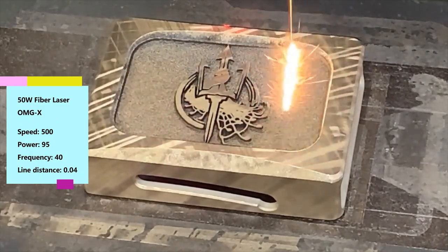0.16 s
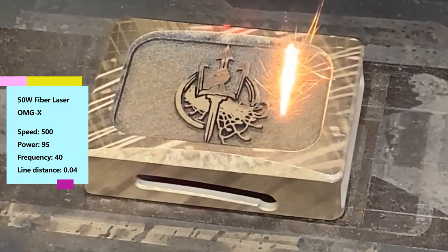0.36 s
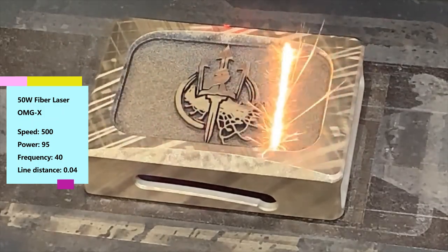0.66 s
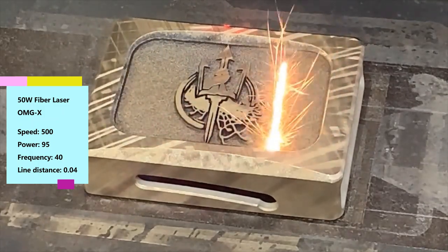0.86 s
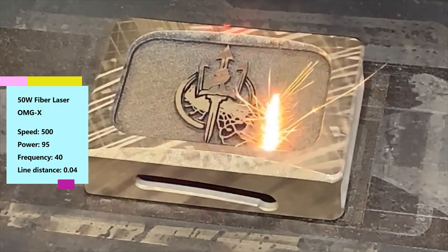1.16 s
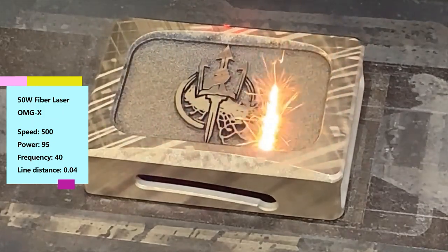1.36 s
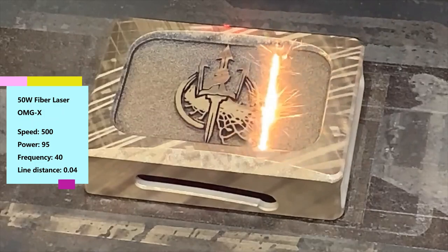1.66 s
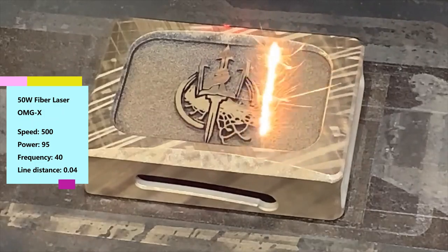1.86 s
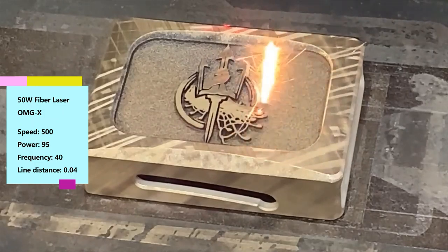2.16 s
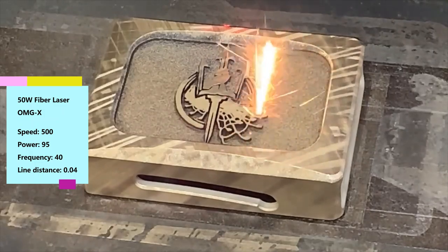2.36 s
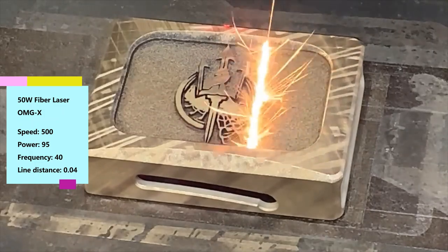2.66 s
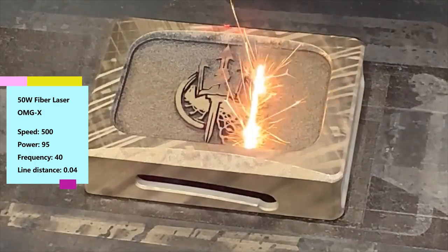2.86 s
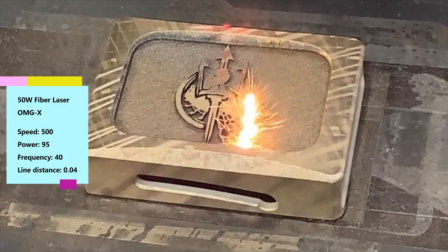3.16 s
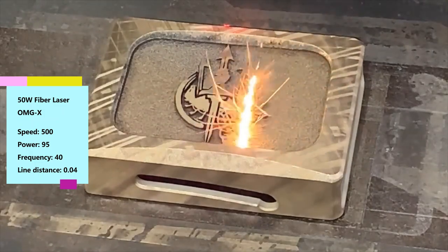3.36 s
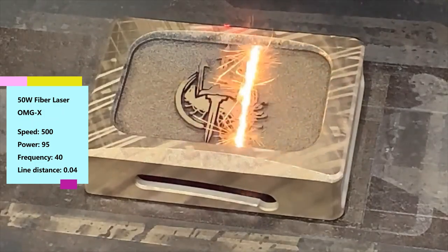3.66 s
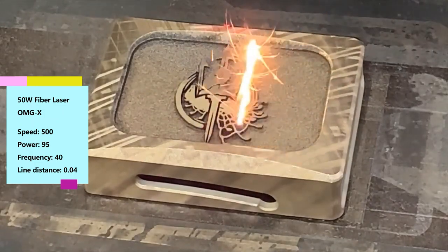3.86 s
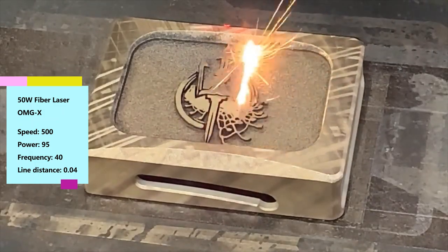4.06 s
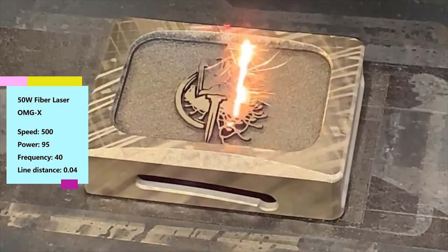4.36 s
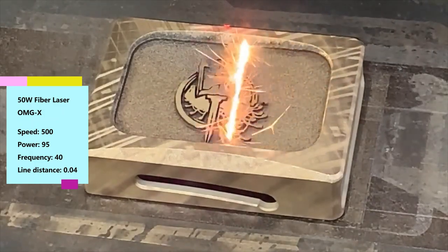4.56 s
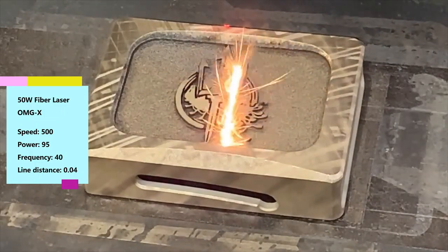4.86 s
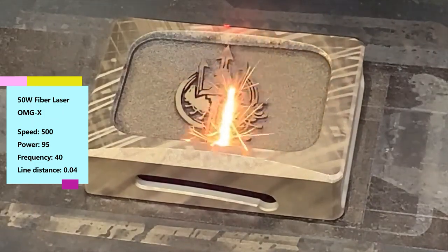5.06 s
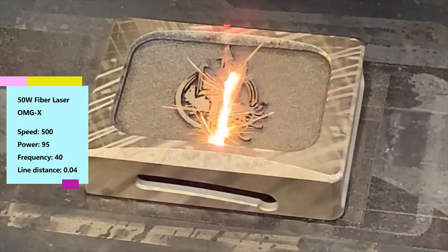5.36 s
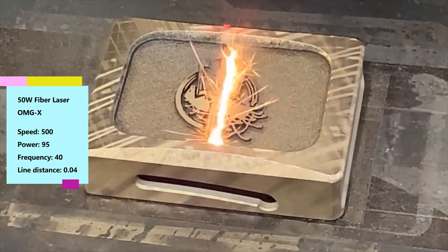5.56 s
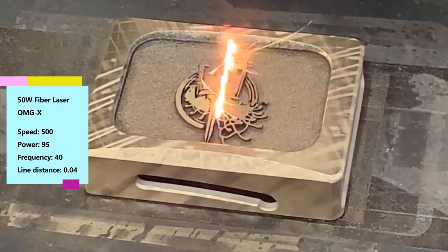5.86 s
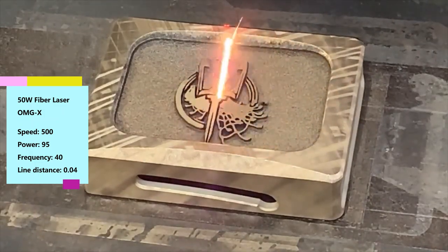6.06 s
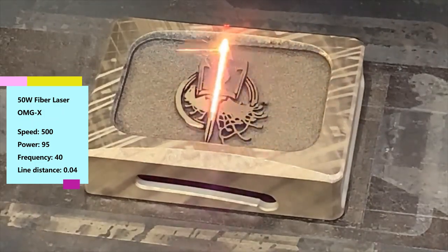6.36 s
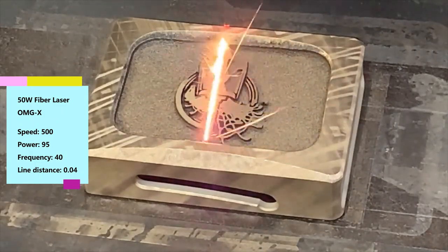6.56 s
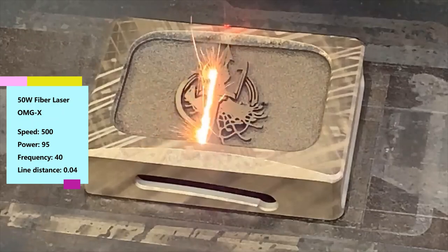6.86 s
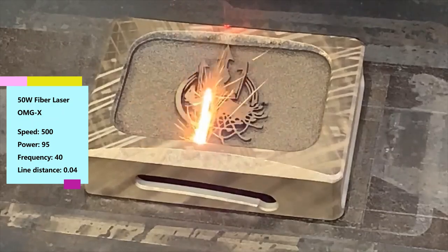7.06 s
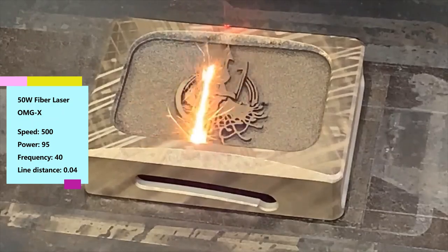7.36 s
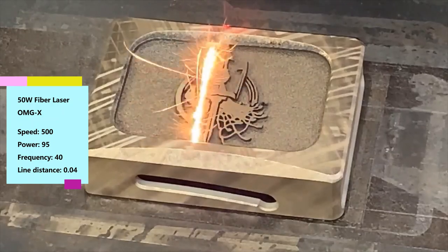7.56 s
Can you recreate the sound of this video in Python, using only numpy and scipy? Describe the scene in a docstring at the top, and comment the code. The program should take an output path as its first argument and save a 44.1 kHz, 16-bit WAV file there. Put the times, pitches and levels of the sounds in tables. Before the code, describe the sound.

A laser engraves a metal plate in a workshop. A bright, harsh hiss flutters very fast, with a raspy buzz underneath and quick spark flares throughout. Around six seconds it turns patchy and crackly with dry ticks, then returns to a steady sizzle. An extractor rumbles low behind it with faint fan hum. Close microphone, slightly stereo, dry sound.

```python
"""A fiber laser deep-engraves an emblem into a metal plate, running up and down one line about 29 times a second.
Boiling metal hisses and flutters as shaped noise, loudest near the turns at the start of the line; shapes
switch its level, and each spark is a quick flare. Raspy overtones, fuzzy whistles and dry ticks join it.
Behind it an extractor rumbles as filtered noise with an unsteady low drone, and fan tones hum."""
import sys
import numpy as np
from scipy import signal
from scipy.fft import rfft, irfft, next_fast_len
from scipy.io import wavfile
from scipy.ndimage import uniform_filter1d, map_coordinates

SR = 44100
rng = np.random.default_rng(int(sys.argv[2]) if len(sys.argv) > 2 else 0)


def bounce(signal):
    """Save signal as a 16-bit WAV file at the path given by the first command-line argument."""
    frames = np.transpose(np.atleast_2d(signal))
    limited = np.clip(frames, -1, 1)
    pcm = np.round(limited * 32767).astype(np.int16)
    wavfile.write(sys.argv[1], SR, pcm)


N = 340893
T = np.arange(N) / SR  # time, s
SIZE = next_fast_len(N, True)
HZ = np.fft.rfftfreq(SIZE, 1 / SR)

SWEEP_HZ = 29.465  # round trips of the beam each second


# Colour of the hiss in the middle and at the sides; only its shape counts: pitch_hz, density_db (per Hz)
HISS_COLOUR = [(350, -50), (600, -1), (708, -7), (774, -10), (856, -7.5), (1560, -16.5), (2050, -18),
               (2500, -17.5), (3800, -48), (4400, -33), (4900, -26.5), (5300, -4.5), (5610, -9),
               (8120, -1.5), (9330, -1), (11600, -5), (12500, -23), (16200, -57), (22000, -120)]
HISS_SIDE_COLOUR = [(530, -42), (900, -12), (1370, -19), (1560, -12), (2550, -14), (3560, -2), (4290, -4),
                    (4670, -2), (5680, -3), (6200, -12), (7290, 0), (8580, -3), (9250, -10), (9980, -6),
                    (12000, -29), (15600, -59), (22000, -120)]
# Resonances the hiss takes on in the middle and at the sides: pitch_hz, width_hz, boost_db
HISS_RESONANCES = [(827, 580, -22.5), (2386, 384, -12.5), (5840, 190, 5), (6310, 680, 4.5),
                   (9304, 1370, 5.5), (10260, 700, 0.5), (11140, 1420, 4.5)]
HISS_SIDE_RESONANCES = [(3500, 400, 2.5), (4250, 300, 0.5), (4630, 340, 3.5), (6200, 700, 2),
                        (7300, 800, 2.5), (8460, 600, 5), (8970, 600, -13), (10800, 440, -12)]


def laser(hiss_db=-27.5, side_db=-35):
    """The burning spot, a little off centre; a separate side hiss stands for reflections from the bed."""
    vapour = plume()
    jet = lingering(np.hypot(vapour, sparks(vapour)))
    middle_hiss = shifting(hiss(jet, colour(HISS_COLOUR, HISS_RESONANCES)))
    mid = gain_of(hiss_db) * middle_hiss + rings(jet) + buzz()
    side_hiss = hiss(jet, colour(HISS_SIDE_COLOUR, HISS_SIDE_RESONANCES))
    side = gain_of(side_db) * side_hiss + off_centre(mid)
    return np.array([reflected(mid + side), reflected(mid - side)])


def plume(relief_db=0.5, memory_s=0.45, boiling_db=0.5, boiling_hz=2700):
    """Moment-to-moment strength of the vapour jet: design, rough surface and boiling."""
    rough_db = relief_db * relief(memory_s, count=28)
    return gain_of(bite() + rough_db + boiling_db * drift(boiling_hz))


def beam_place(turn_s=0.0213):
    """Where the beam is on its line, 0 to 1 and back at a steady speed; it is at the start at turn_s."""
    return 2 * abs(((T - turn_s) * SWEEP_HZ + .5) % 1 - .5)


# Shapes of the emblem, crossed on the way out and back; skipped ones are negative, fresh metal is positive:
# start_s, end_s, near_place (0-1 along the line), far_place (0-1), change_db
EMBLEM_SHAPES = [(0.216, 1.44, 0.01, 0.26, 1), (3.895, 4.082, 0.06, 0.22, 3), (3.94, 4.477, 0.03, 1, -1.5),
                 (4.32, 4.656, 0, 0.8, -1), (4.37, 4.647, 0.38, 0.54, -9), (5.78, 6.413, 0.04, 0.84, -2.5),
                 (5.804, 5.93, 0.96, 1.1, -21), (5.869, 6.05, 0.04, 0.46, -10),
                 (6.104, 6.225, 0.63, 0.88, -9), (6.215, 6.627, 0.51, 1.1, -3),
                 (6.23, 6.39, 0.06, 0.34, -13), (6.41, 6.498, 0.11, 0.25, 9), (6.5, 6.6, 0.55, 1.1, -5),
                 (6.24, 6.42, 0.3, 0.95, -3.5), (6.51, 6.6, 0.42, 0.72, -4)]


def bite(tilt_db=1.9, dwell_db=2.5, dwell_share=0.75, outline_s=0.055, outline_share=0.017):
    """How strongly the beam burns where it is now, in dB: lean of the line, turning points and shapes."""
    place = beam_place()
    db = tilt_db * (.5 - place)  # bites harder at the start of the line
    to_turn = np.minimum(place, 1 - place)
    db += dwell_db * np.exp(-to_turn / dwell_share)
    for start_s, end_s, near, far, shape_db in EMBLEM_SHAPES:
        # outlines are met gradually, from sweep to sweep and along the line
        present = inside(T, start_s, end_s, outline_s)
        db += shape_db * present * inside(place, near, far, outline_share)
    return db


def relief(memory_s, count):
    """Roughness under the beam, count bumps a sweep; each sweep meets nearly the same bumps as the last."""
    bumps = rng.standard_normal((int(T[-1] * SWEEP_HZ) + 20, count))
    kept = np.exp(-1 / (memory_s * SWEEP_HZ))
    bumps = signal.lfilter([1], [1, -kept], bumps, axis=0)
    bumps = bumps[::-1].ravel()  # starts from the sweeps whose memory has settled
    return evened(np.interp(T * SWEEP_HZ * count, np.arange(len(bumps)), bumps))


# The largest sparks, which also snap if they fall in the crackle: start_s, peak_db, rise_s
LARGE_SPARKS = [(0.392, -13, 0.0032), (0.459, -10, 0.0016), (0.4923, -14, 0.0018), (0.766, -12.5, .0015),
                (0.8074, -16, .002), (0.8325, -15, 0.0018), (1.037, -14.5, 0.0019), (1.4108, -12, 0.0011),
                (1.684, -13, 0.0018), (2.363, -17, 0.00059), (3.8541, -13, 0.0012), (4.537, -22, 0.0018),
                (4.5465, -20, 0.0016), (5.1454, -10, 0.0016), (5.164, -10, 0.00082), (5.1814, -14, 0.00087),
                (5.1944, -13.5, .001), (5.228, -10, 0.0011), (5.247, -13, 0.0024), (5.316, -12, .001),
                (5.3844, -15, 0.0017), (5.9011, -24, 0.0012), (5.9696, -21, 0.0048), (5.993, -15, .001),
                (6.0274, -20, .0008), (6.041, -17, 0.0022), (6.0762, -22, .0012), (6.1446, -11.5, 0.001),
                (6.18, -16, .0007), (6.196, -19, 0.0011), (6.2647, -16, 0.00062), (6.2985, -15.5, 0.00091),
                (6.333, -13.5, 0.0008), (6.366, -18, 0.0013), (6.4, -13, 0.0016), (6.4384, -12.5, 0.0011),
                (6.4702, -9.5, 0.001), (6.4989, -24, .002), (6.5524, -27, .0007), (6.5676, -20, 0.002),
                (6.5995, -19, .003), (6.6334, -18, .003), (6.837, -14, 0.0018)]


def sparks(jet, per_s=12, spark_db=-8, spread_db=2, rise_s=0.0016, jet_peak_db=-19.5):
    """Small sparks flare at random with the jet; large ones are timed and set against jet_peak_db."""
    flying = rng.random(N) < per_s / SR
    kicks = flying * jet * gain_of(spark_db + spread_db * rng.uniform(-0.92, 1, N))
    out = signal.oaconvolve(kicks, flare(T[T < 10 * rise_s] / rise_s))[:N]
    for start_s, peak_db, large_rise_s in LARGE_SPARKS:
        lit = (T >= start_s) & (T < start_s + 10 * large_rise_s)
        out[lit] += gain_of(peak_db - jet_peak_db) * flare((T[lit] - start_s) / large_rise_s)
    return out


def flare(age):
    """A spark flares quickly and dies more slowly; its peak is at an age of one."""
    return age * np.exp(1 - age)


def lingering(jet, wet=0.13, ring_s=0.0026):
    """The machine's bed and frame hold a share of each flare's power for a few milliseconds."""
    kept = np.exp(-1 / (ring_s * SR))
    tail = signal.lfilter([1 - kept], [1, -kept], jet ** 2)
    return np.sqrt((1 - wet) * jet ** 2 + wet * tail)


# How hard the metal burns; the hiss follows only departures from each column's mean, the buzz the values:
# time_s, sizzle_db, lower_hiss_db (relative to the sizzle), hollow_body_db (relative to the sizzle)
BURN_CURVE = [(0.0, -29.5, -6, -24), (0.4, -30, -5.2, -25), (1.0, -30, -5.5, -25),
              (1.5, -30.5, -5.3, -25.5), (1.72, -29, -5, -24.5), (1.92, -30, -3.5, -22),
              (2.15, -29, -4, -22.5), (2.35, -30, -3.5, -23), (2.66, -28, -4, -24),
              (2.85, -30, -2.5, -23.5), (3.4, -30.5, -3.3, -21), (3.9, -29.5, -3, -23),
              (4.36, -29, -2.5, -22), (4.65, -28, -1, -22.5), (4.9, -30.5, -2.5, -21.5),
              (5.08, -31, -3, -21), (5.3, -31, -1.5, -20.5), (5.7, -30, -1.5, -20.5),
              (5.9, -29.5, -4, -24.5), (6.2, -32.5, 0, -21), (6.6, -30.5, -0.5, -22),
              (6.87, -29, -2.5, -24), (7.73, -30, -2.5, -22.5)]


def hiss(jet, gain, lower_depth=1.0, body_depth=0.15, own_db=0.1, own_hz=300):
    """Noise of the jet in three ranges; each follows the burn and has some flutter of its own."""
    burn, lower, body = (db - db.mean() for db in curves(BURN_CURVE))
    under_sizzle, under_lower = below(7960, order=16), below(3500, order=8)
    # range passed, its fullness in dB, how deeply the jet moves it
    ranges = [(np.sqrt(1 - under_sizzle ** 2), 0, 1),
              (under_sizzle * np.sqrt(1 - under_lower ** 2), lower, lower_depth),
              (under_lower, body, body_depth)]
    out = 0
    for passed, fullness_db, depth in ranges:
        strength = evened(jet ** depth * gain_of(burn + fullness_db + own_db * drift(own_hz)))
        out = out + filtered(strength * rng.standard_normal(N), passed * gain)
    return evened(out)


# A dip in the sizzle, mostly climbing as the beam moves across the plate: time_s, pitch_hz, depth_db
SIZZLE_NOTCH = [(0, 7450, -6), (1.8, 7420, -6), (2.6, 7840, -8), (3.4, 8040, -5.5), (5.5, 8130, -8),
                (6.5, 8580, -5), (7.7, 8530, -7.5)]


def shifting(x, patchy_db=2.0, notch_width_hz=330):
    """The hiss flickers in small patches of time and pitch, and its high dip drifts mostly upward."""
    hz, t, z = signal.stft(x, SR, nperseg=512, noverlap=384)
    notch_hz, notch_db = (np.interp(t, T, c) for c in curves(SIZZLE_NOTCH))
    notch = notch_db * np.exp(-((hz[:, None] - notch_hz) / notch_width_hz) ** 2)
    db = patchy_db * patches(z.shape, bins=5, frames=11) + notch
    return evened(signal.istft(z * gain_of(db), SR, nperseg=512, noverlap=384)[1][:N])


# Narrow fuzzy bands that flicker in the lower hiss; pitch is at the middle of each span:
# start_s, end_s, pitch_hz, glide_hz_per_s, width_hz, level_db
FUZZY_WHISTLES = [(-.2, 2.38, 3000, 0, 250, -55), (-.2, 2.1, 4000, -26, 280, -56),
                  (-.2, 2.46, 4930, -2.5, 380, -49.5), (2.15, 3.12, 3350, 161, 400, -51),
                  (2.3, 3.04, 4150, 57, 270, -50), (2.45, 3.13, 4720, 351, 400, -48),
                  (3.05, 7.9, 2830, -4, 270, -52.5), (3.1, 7.9, 3560, 12.5, 217, -54.5),
                  (3.1, 7.9, 4270, 1, 213, -53.5), (3.2, 7.9, 4730, -10.5, 230, -53.5)]


def rings(jet, wander_hz=40, wander_rate_hz=6, fade_s=0.041):
    """Fuzzy whistles in the lower hiss; each glides, wanders and flutters, and fades in and out over its span."""
    jet_depth, flutter_db, flutter_hz = 0.6, 7, 16
    out = np.zeros(N)
    for start_s, end_s, hz, glide_hz_per_s, width_hz, db in FUZZY_WHISTLES:
        glide_hz = glide_hz_per_s * (T - (start_s + end_s) / 2)
        centre_hz = hz + glide_hz + wander_hz * drift(wander_rate_hz)
        flutter = evened(gain_of(flutter_db * np.minimum(drift(flutter_hz), 1)))
        level = gain_of(db) * flutter * inside(T, start_s, end_s, fade_s)
        out += level * band(centre_hz, width_hz)
    return out * evened(jet ** jet_depth)


def buzz(buzz_db=-4.0, centre_hz=1480, width_hz=380):
    """The bumps met again on every sweep give a raspy row of overtones."""
    burn, _, body = curves(BURN_CURVE)
    bumps = relief(0.17, count=240)
    return gain_of(burn + body + buzz_db) * shaped(bumps, 1 / (1 + ((HZ - centre_hz) / width_hz) ** 4))


def off_centre(mid, lean=0.17, lean_hz=5400, lean_width_hz=1300):
    """Left-right difference of the direct hiss: louder on the left around lean_hz, a little earlier on the right."""
    steady, lead, lead_s = .015, .2, .000136
    louder = steady + lean * np.exp(-((HZ - lean_hz) / lean_width_hz) ** 2)
    earlier = -1j * lead * np.sin(2 * np.pi * HZ * lead_s) * below(7500, order=8)
    return filtered(mid, louder + earlier)


# Two close reflections; the first shortens overall as the beam moves across the plate:
# time_s, first_delay_ms, first_strength (ratio), second_delay_ms, second_strength (ratio)
REFLECTIONS = [(0, 0.84, 0.067, 0.9, 0.1), (1.6, 0.74, 0.047, 1.67, 0.1), (2.2, 0.58, 0.32, 0.79, 0.062),
               (2.85, 0.61, 0.33, 1, 0.025), (3.3, 0.596, 0.042, 1.165, 0.037),
               (7.7, 0.43, 0.053, 1.38, 0.08)]


def reflected(x, dull_hz=7500):
    """Nearby metal echoes the jet within two milliseconds: a slowly shifting hollow colour."""
    first_ms, first, second_ms, second = curves(REFLECTIONS)
    dulled = filtered(x, below(dull_hz, order=2))

    def late(ms):
        return map_coordinates(dulled, [np.arange(N) - ms * SR / 1000], order=3)

    return x + first * late(first_ms) + second * late(second_ms)


# Colour of a dry tick; only its shape counts: pitch_hz, density_db (per Hz)
TICK_COLOUR = [(300, -40), (1500, -15), (2500, -12), (4000, -18.5), (6000, -8), (9500, 2), (12000, -4)]
# Where the beam keeps switching over fine detail: start_s, end_s
DETAIL_SPAN = (6, 6.58)


def crackle(per_s=120, tick_db=-34, spread_db=6, tick_s=0.00034, snap_db=-10, wide=0.66):
    """Dry broadband ticks over the fine detail, where each large spark also starts with a snap."""
    detail = inside(T, *DETAIL_SPAN, .03)
    ticking = rng.random(N) < per_s / SR
    kicks = ticking * gain_of(tick_db + spread_db * rng.uniform(-0.6, 1, N))
    for start_s, peak_db, _ in LARGE_SPARKS:
        kicks[round(start_s * SR)] += gain_of(peak_db + snap_db)
    level = signal.oaconvolve(kicks * detail, flare(T[T < 10 * tick_s] / tick_s))[:N]
    mid, side = (level * shaped(rng.standard_normal(N), colour(TICK_COLOUR)) for _ in range(2))
    return np.array([mid + wide * side, mid - wide * side])


# Peaks and dips in the colour of hiss and air, steady or lasting only a while:
# start_s, end_s, pitch_hz, width_hz, change_db
COLOUR_BUMPS = [(-1, 9, 3100, 160, -2.5), (-1, 9, 4030, 260, 2.5), (-1, 9, 4310, 200, -3),
                (-1, 9, 5200, 250, -2.2), (-1, 9, 5560, 300, 2.7), (-1, 9, 5970, 220, -3),
                (-1, 3, 2420, 400, 3.5), (-1, 2.9, 3550, 350, -4.5), (-1, 2.8, 4680, 350, -5.5),
                (-1, 2.8, 7150, 400, 2.5), (-1, 2.7, 8400, 500, -2.2), (1.8, 3, 2830, 350, 4),
                (1.9, 2.9, 4050, 250, 2.5), (1.9, 2.9, 5520, 300, 2), (3, 9, 4800, 200, 2),
                (-1, 1.8, 590, 160, -4), (-1, 1.9, 1150, 120, -2)]


def hollows(pair, fade_s=0.2):
    """Peaks and dips in the noise change over as the beam moves onto the emblem; the middle range is mottled."""
    mottle_db, mottle_hz, mottle_octaves = 2.0, 2500, 1.6
    hz, t, z = signal.stft(pair, SR, nperseg=1024, noverlap=768)
    db = np.zeros((len(hz), len(t)))
    for start_s, end_s, centre_hz, width_hz, change_db in COLOUR_BUMPS:
        bell = np.exp(-(2 * (hz - centre_hz) / width_hz) ** 2)
        db += change_db * np.outer(bell, inside(t, start_s, end_s, fade_s))
    octaves_away = np.log2((hz[:, None] + 1) / mottle_hz)
    middle = np.exp(-(octaves_away / mottle_octaves) ** 2)
    db += mottle_db * patches(db.shape, bins=4, frames=9) * middle
    return signal.istft(z * gain_of(db), SR, nperseg=1024, noverlap=768)[1][:, :N]


# The extractor's rush of air, middle and sides; only its shape counts: pitch_hz, density_db (per Hz)
AIR_COLOUR = [(15, -59), (25, -23), (54, -21), (108, 5.5), (139, -1.5), (227, -5), (346, -7), (396, -9),
              (453, -10.5), (493, -6.5), (583, -24), (702, -14), (776, 2), (859, -11), (1400, -29.5),
              (1820, -66), (3080, -120)]
AIR_SIDE_COLOUR = [(29, -40), (50, -25), (100, -6), (175, -2), (210, -5), (252, 1), (306, -5.5), (499, 8),
                   (669, 5.5), (769, 3), (848, -5), (1400, -9), (1820, -46), (3080, -120)]
# Duct resonances of that air, middle and sides: pitch_hz, width_hz (at least pitch / 14), boost_db
DUCT_RESONANCES = [(116, 69, -6), (180.6, 75, 3.5), (230, 31, 5), (396.7, 36, 5.5), (460, 28, -2),
                   (813, 192, -11)]
DUCT_SIDE_RESONANCES = [(250, 22, -2), (530, 150, 9.5), (780, 140, 9)]


def extractor(air_db=-40.5, mid_db=-1.5, side_db=-14.0):
    """Air rushing through a duct, its middle swelling slightly; mid_db and side_db are relative to air_db."""
    swell_db = 0.73 * drift(5.3)
    mid_air = shaped(rng.standard_normal(N), colour(AIR_COLOUR, DUCT_RESONANCES))
    side_air = shaped(rng.standard_normal(N), colour(AIR_SIDE_COLOUR, DUCT_SIDE_RESONANCES))
    mid = gain_of(mid_db + swell_db) * mid_air
    side = gain_of(side_db) * side_air
    return gain_of(air_db) * np.array([mid + side, mid - side])


# Surges of the extractor's low drone: start_s, length_s, level_db (before surge_db is added)
DRONE_SURGES = [(0.28, 0.11, -41), (0.587, 0.27, -41.5), (1.046, 0.1, -34.5), (1.213, 0.24, -38),
                (1.687, 0.06, -52.5), (2.158, 0.23, -42.5), (3.469, 0.07, -35.5), (3.91, 0.12, -47),
                (4.615, 0.049, -38), (4.843, 0.058, -34), (5.344, 0.099, -36.5), (5.518, 0.12, -38),
                (5.821, 0.27, -44), (6.52, 0.52, -44.5), (7.2, 0.07, -77), (7.573, 0.19, -40)]


def drone(hz=109.0, waver_hz=3.6, usual_db=-53.5, shudder_db=3.5, surge_db=-6.0, surge_edge_s=0.021,
          throb_db=-3.0):
    """The extractor's unsteady low note, alike on both sides; it throbs and now and then surges."""
    turn = 2 * np.pi * np.cumsum(hz + waver_hz * drift(10.4)) / SR
    level = gain_of(usual_db + throb_db * drift(37.0))
    for start_s, length_s, db in DRONE_SURGES:
        surge = gain_of(db + surge_db) * inside(T, start_s, start_s + length_s, surge_edge_s)
        level = np.hypot(level, surge)
    shudder = gain_of(shudder_db * np.minimum(drift(9.4), 1))
    return level * shudder * np.sqrt(2) * np.sin(turn)


# Soft booms and swells in the duct: start_s, length_s, pitch_hz, level_db
DUCT_BOOMS = [(0.73, 0.047, 243, -40.5), (1.106, 0.085, 191.3, -41), (2.03, 0.11, 220, -41.5),
              (3.998, 0.89, 399.6, -53), (7.052, 0.54, 420, -50.5), (7.424, 0.08, 241, -39.5)]


def booms(width_hz=70, edge_s=0.013):
    """Swells of the duct's rumble, each a narrow band of noise faded in and out."""
    return sum(gain_of(db) * inside(T, start_s, start_s + length_s, edge_s) * band(hz, width_hz)
               for start_s, length_s, hz, db in DUCT_BOOMS)


# Fan tones: pitch_hz, level_db (halfway through), waver_hz, left_right_phase_rad, growth_db_per_s
FAN_TONES = [(762.4, -56, 0.8, -1.3, 0.2), (792, -54, 0.5, -1.39, 0.4), (872, -69, 0.8, 0, -1.3)]


def fans(unsteady_db=1.6, waver_rate_hz=6, swell_rate_hz=3):
    """Slightly wavering blade tones; the close pair beats."""
    out = np.zeros((2, N))
    for hz, db, waver_hz, apart, growth_db_per_s in FAN_TONES:
        turn = 2 * np.pi * np.cumsum(hz + waver_hz * drift(waver_rate_hz)) / SR
        level_db = db + growth_db_per_s * (T - T.mean()) + unsteady_db * drift(swell_rate_hz)
        out += gain_of(level_db) * np.sqrt(2) * np.sin([turn + apart / 2, turn - apart / 2])
    return out


def gain_of(db):
    """Decibels to amplitude."""
    return 10 ** (np.asarray(db) / 20)


def evened(x):
    """Scales to an rms of one."""
    return x / np.sqrt(np.mean(x ** 2) + 1e-20)


def curves(rows):
    """Each column of a table, drawn out over time."""
    s, *columns = np.transpose(rows)
    return [np.interp(T, s, c) for c in columns]


def inside(x, start, end, soft):
    """One between start and end, zero outside, with soft edges."""
    return (1 + np.tanh((x - start) / soft)) * (1 + np.tanh((end - x) / soft)) / 4


def colour(points, peaks=()):
    """Gain at each frequency: a broad spectrum with bell-shaped peaks and dips."""
    hz, db = np.transpose(points)
    bells = sum(d * np.exp(-(2 * (HZ - f) / max(w, f / 14)) ** 2) for f, w, d in peaks)
    return gain_of(np.interp(np.log(HZ + 1), np.log(hz + 1), db) + bells)


def below(edge_hz, order=4):
    """Gain of a low-pass."""
    return 1 / np.sqrt(1 + (HZ / edge_hz) ** (2 * order))


def filtered(x, gain):
    """Filters x by a gain at each frequency."""
    return irfft(rfft(x, SIZE) * gain, SIZE)[:N]


def shaped(x, gain):
    """Filters x by a gain at each frequency, to an rms of one."""
    return evened(filtered(x, gain))


def drift(rate_hz):
    """Random motion up to about a given rate, with an rms of one."""
    return shaped(rng.standard_normal(N), below(rate_hz, order=2))


def band(hz, width_hz):
    """Noise in one narrow band, whose centre may move."""
    turn = 2 * np.pi * np.cumsum(hz * np.ones(N)) / SR
    passed = below(width_hz / 2, order=4)
    return sum(shaped(rng.standard_normal(N), passed) * wave(turn) for wave in (np.cos, np.sin))


def patches(shape, bins, frames):
    """Random patches over pitch and time, smoothed over so many bins and frames, to an rms of one."""
    across_pitch = uniform_filter1d(rng.standard_normal(shape), size=bins, axis=0)
    # a pair of channels has its own patches only where the shape has a channel axis
    return evened(uniform_filter1d(across_pitch, size=frames, axis=1))


def scene():
    """The laser over the workshop's fans."""
    return hollows(laser() + extractor()) + crackle() + drone() + booms() + fans()


def record(dry, edge_hz=11950):
    """A steep band limit."""
    low_pass = signal.firwin(401, edge_hz, window=("kaiser", 9), fs=SR)
    return signal.oaconvolve(dry, low_pass[None], "same")


dry = scene()
out = record(dry)
bounce(out)
```